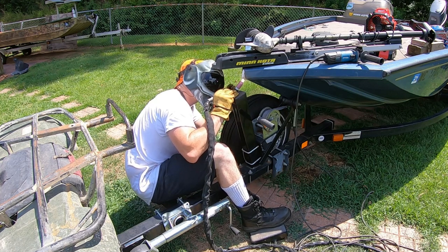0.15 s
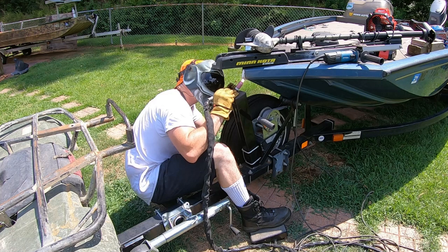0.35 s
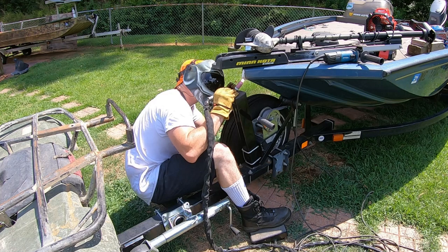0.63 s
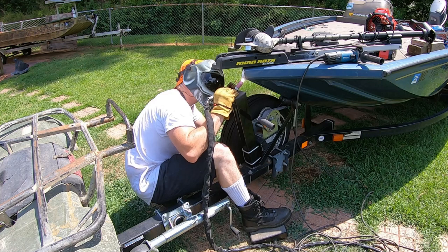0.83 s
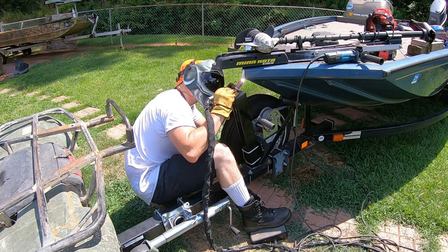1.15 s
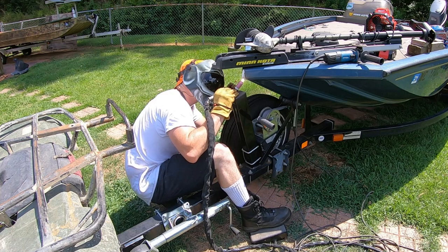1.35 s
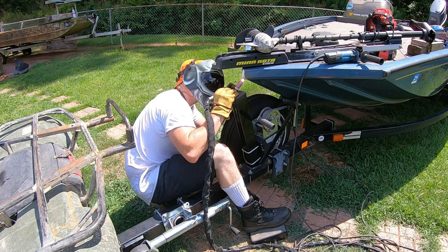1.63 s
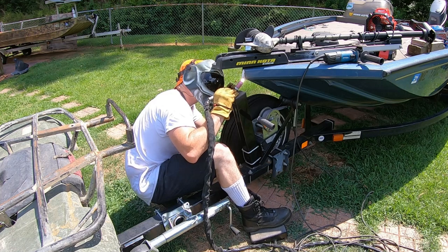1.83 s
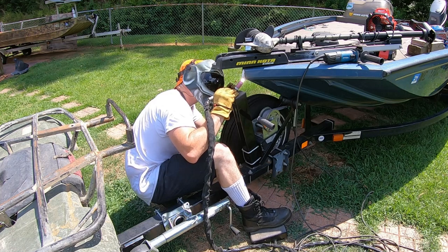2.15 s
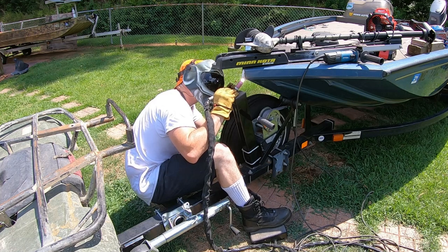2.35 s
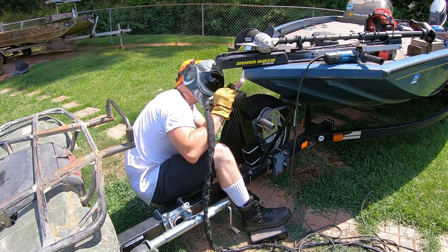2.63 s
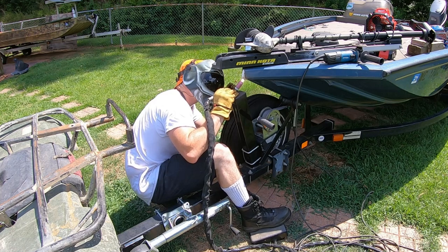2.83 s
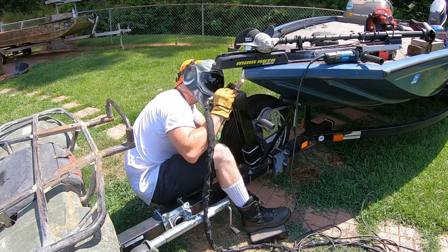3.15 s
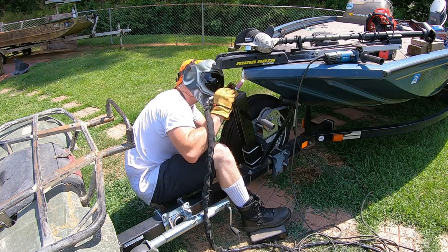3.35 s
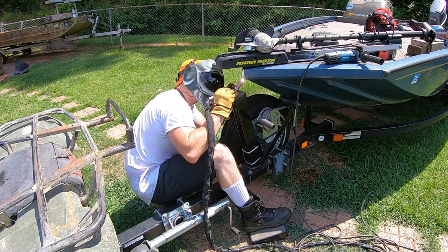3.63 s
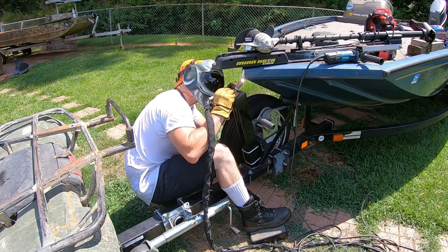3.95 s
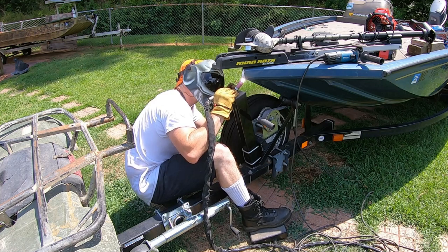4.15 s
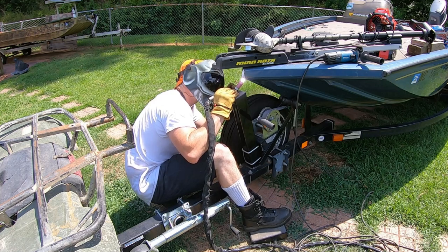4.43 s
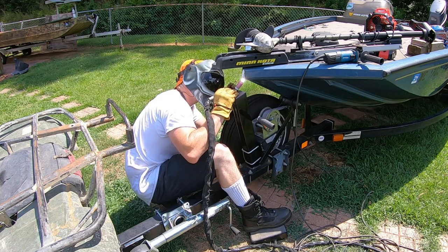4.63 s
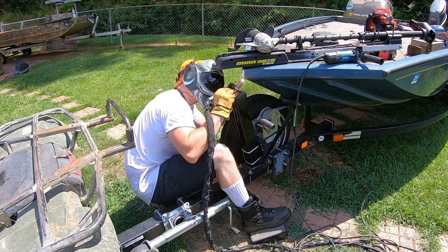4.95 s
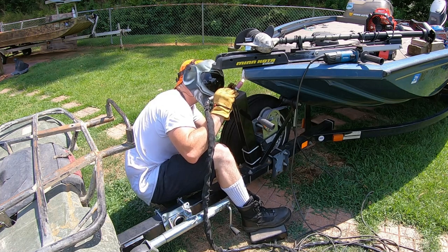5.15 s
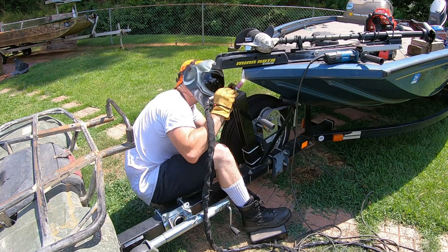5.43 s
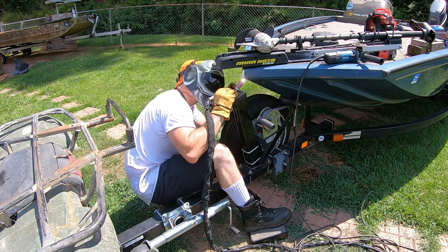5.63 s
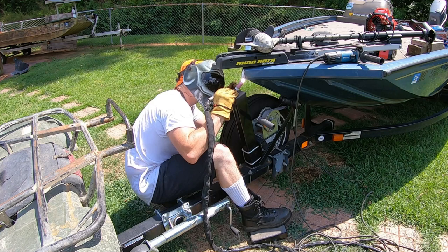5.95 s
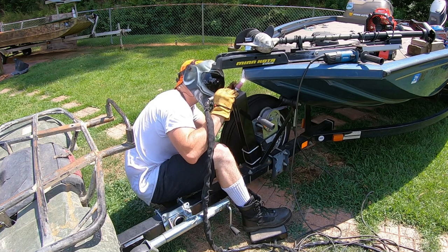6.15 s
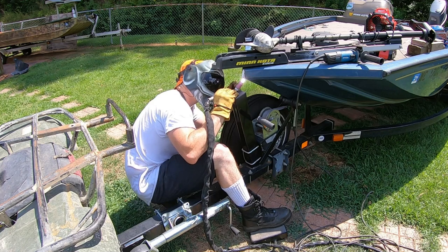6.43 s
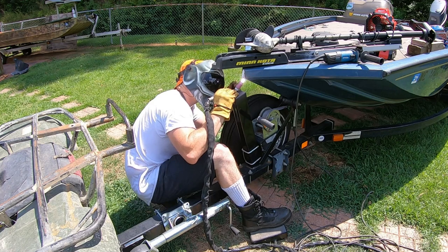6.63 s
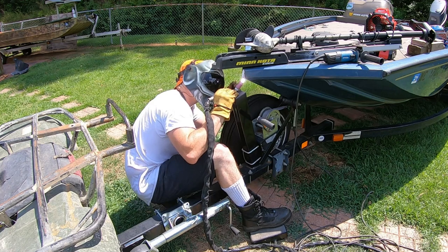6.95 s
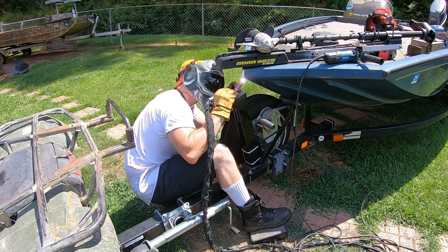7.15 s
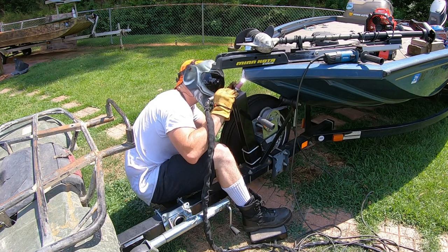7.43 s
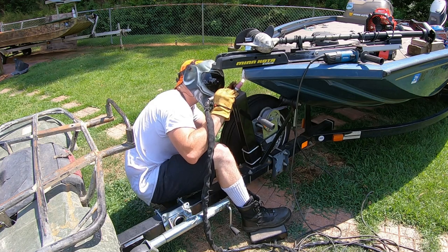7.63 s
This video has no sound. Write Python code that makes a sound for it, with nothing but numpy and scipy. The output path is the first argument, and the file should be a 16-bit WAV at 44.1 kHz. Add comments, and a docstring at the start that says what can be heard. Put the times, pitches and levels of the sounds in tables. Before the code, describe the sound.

Outdoors in a grassy yard, a small camera a few metres off picks up a steady raspy welding buzz, thin and bright, made of dense sharp electrical cracks with sizzling edges. The arc starts softer, grows strong, dips a few times as current is eased, and holds strong near the end. Short reflections from hull and trailer and a faint metallic ring colour it; quiet far traffic, hum and low wind flutter underneath.

```python
"""An alternating-current welding arc on a metal boat hull in a yard, a few metres from a small camera.
The arc cracks at each reversal of the current, twice a cycle, and the timing hitches every sixth cycle.
Filtered clicks make the cracks, gated noise their fizz; hull, trailer and ground echo them, the hull rings.
Behind lie far traffic and machinery (flickering noise bands), a machine's hum (wavering tones)
and wind on the microphone (very low noise)."""
import sys
import numpy as np
from scipy import signal
from scipy.fft import rfft, irfft, next_fast_len
from scipy.io import wavfile
from scipy.ndimage import uniform_filter1d

SR = 44100
rng = np.random.default_rng(int(sys.argv[2]) if len(sys.argv) > 2 else 0)


def amplitude_ratio(level_db):
    """Convert a level in decibels to the matching linear amplitude (field) ratio."""
    exponent = np.asarray(level_db, float) / 20
    return 10 ** exponent


def bounce(signal):
    """Save signal as a 16-bit WAV file at the path given by the first command-line argument."""
    frames = np.transpose(np.atleast_2d(signal))
    limited = np.clip(frames, -1, 1)
    pcm = np.round(limited * 32767).astype(np.int16)
    wavfile.write(sys.argv[1], SR, pcm)


N = 343539

# wind at the microphone port: t/s, level/dB
WIND_LEVEL = [(0.0, -34.5), (0.39, -31), (0.82, -36), (0.89, -28.5), (1.93, -48), (2.08, -28.5),
              (4.58, -41), (5.68, -22), (5.79, -43), (5.95, -35), (7.03, -38.5), (7.12, -21), (7.27, -48),
              (7.4, -34), (7.72, -32), (7.79, -46)]
# spectrum of the far yard, relative density: f/Hz, level/dB
YARD_SPECTRUM = [(18, -28), (30, -18), (59, -17), (164, -12.5), (249, -3), (389, -16), (479, -9),
                 (709, -14.5), (1970, -16.5), (4660, -24), (7650, -36), (9940, -25), (15500, -56)]
# course of the far yard: t/s, level/dB
YARD_COURSE = [(0.0, -40.5), (0.91, -32.5), (1.45, -41), (1.84, -34.5), (2.75, -39), (3.36, -33),
               (5.05, -40.5), (5.51, -34), (6.25, -41), (7.79, -41.5)]
# tones of the machine's hum, nominal peak level: f/Hz, level/dB
HUM_TONES = [(107.7, -51), (209.9, -49.5)]
# loudness of the arc as the pedal eases the current off and on: t/s, level/dB
ARC_LEVEL = [(0, -28.5), (.54, -23.5), (.6, -20.5), (.89, -21.5), (.95, -17), (1.43, -22.5), (1.54, -29),
             (1.8, -26.5), (1.84, -21), (1.99, -17.5), (2.3, -20.5), (2.54, -19.5), (2.95, -25.5),
             (3.14, -22.5), (3.43, -22.5), (3.58, -19), (4.12, -21), (4.36, -18), (4.87, -22.5), (4.9, -30),
             (5.32, -25), (5.37, -21.5), (5.68, -18), (5.9, -20), (7.68, -20.5), (7.76, -26)]
# colour of the first and of the second crack of a cycle: f/Hz, level/dB
FIRST_CRACK = [(300, -46.0), (600, -29.5), (1000, -30.0), (1800, -16.5), (3000, -7.5), (4600, -2.0),
               (6000, 0.0), (7500, -1.5), (9000, -4.0), (10200, -21.0), (12000, -31.0), (14000, -29.5),
               (15700, -35.0)]
SECOND_CRACK = [(300, -46.0), (600, -31.0), (1000, -22.5), (1800, -10.0), (3000, -6.5), (4600, -6.0),
                (6000, -2.5), (7500, -5.0), (9000, -6.0), (10200, -30.0), (12000, -33.5), (14000, -30.0),
                (15700, -37.0)]
# lift that the camera housing gives the cracks and their fizz: f/Hz, level/dB
HOUSING_LIFT = [(1000, -2), (1700, 1.5), (2700, 0), (5000, 0.5), (9000, 1), (10000, 4), (11500, 4),
                (12800, 15.5), (14200, 9), (15700, 6.5)]
# low band, treble and topmost treble of the cracks against their middle band:
# t/s, low level/dB, treble level/dB, topmost level/dB
CRACK_BALANCE = [(0, -0.5, 7, 2), (.45, -1, 7, -2), (.75, 0, 4, -7), (1.2, 0, 1, 3), (1.45, 0, 0, 1),
                 (1.7, -1, 7, 2), (2, 0.5, -3, -2), (2.3, 0.5, -2, 2), (2.8, 0, 1, -1), (3.3, -1.5, 7.5, 3),
                 (3.6, -0.5, 2, -6), (4.2, 0, -3, -3), (4.5, 3, -4, 3), (5.1, -0.5, 6, 4),
                 (5.45, -0.5, 0, -4), (6, 1, -1, 1.5), (7.5, 2, -2.5, 3), (7.79, 0, -2, -3)]
# moments when the cracks flare bright: t/s, treble lift level/dB, length/s
BRIGHT_FLARES = [(7.335, 8, 0.011)]
# stumbles, where a run of cycles jumps across its window: first crack t/s
RUN_STUMBLES = [2.56996, 2.8081, 2.87082, 2.92783, 3.40786, 3.47016, 3.52815, 4.01021, 4.3679, 4.43079,
                4.48788, 5.26996, 5.32782, 6.64996, 6.88785, 6.95032]
# echoes off hull, trailer and ground: delay/ms, signed gain/1
NEAR_ECHOES = [(0.156, -0.43), (0.227, -0.79), (0.315, -0.45), (0.445, 0.16), (0.522, 0.33), (0.649, 0.17),
               (0.709, -0.12), (0.765, 0.13), (0.918, 0.19), (1.035, -0.14), (1.207, 0.14), (1.264, -0.1),
               (1.369, -0.1), (1.457, 0.11), (1.599, 0.12), (1.738, -0.08), (1.834, 0.13), (1.91, 0.14),
               (2.163, 0.19), (2.268, -0.06), (2.389, -0.17), (2.554, 0.12), (2.707, 0.09), (2.769, -0.07),
               (2.911, 0.05), (3.107, 0.08), (3.455, 0.13), (3.591, -0.12), (3.812, -0.12), (4.28, -0.1),
               (4.816, -0.15), (4.921, -0.1), (5.02, -0.23), (5.105, -0.18), (5.261, 0.1), (5.553, -0.07)]
# plate modes of the hull, relative level: f/Hz, width/Hz, level/dB
HULL_MODES = [(494, 22, -12.5), (597, 8.9, 9.5), (796, 116, -2), (1535, 18, -0.5)]

CYCLE_S, SWING_S, RESET_S = .0099843, .00401, .0071  # cycle; first to second crack; second crack to next run
# runs of six cycles follow a clock: period, first run, window of lateness (s)
CLOCK_S, FIRST_RUN_S, EARLY_S, LATE_S = .06, -.0122, 0, .0021
# on low current each run slips later until it is pulled back; on full current some runs stray at random
LOW_DB, SLIP_S, PULL_S, STRAY_S, STRAY_SHARE = -22, .00048, .002, .0004, .5

T = np.arange(N) / SR
SIZE = next_fast_len(N + SR // 4)  # room for echoes to run out
HZ = np.arange(SIZE // 2 + 1) * SR / SIZE


def unit(x):
    """Scale to rms 1."""
    return x / np.sqrt(np.mean(x ** 2))


def curve(table, column=1):
    """One column of a table, for every sample."""
    rows = np.array(table)
    return np.interp(T, rows[:, 0], rows[:, column])


def swing(table, column=1):
    """A column's movement about its mean."""
    course = curve(table, column)
    return course - course.mean()


def colour_db(points, hz):
    """Straight lines on a log-frequency axis."""
    rows = np.array(points)
    return np.interp(np.log(hz + 1), np.log(rows[:, 0]), rows[:, 1])


def walk(rate):
    """Random levels held 1 / rate s and slewed twice; spread near 1."""
    hold = int(SR / rate)
    steps = np.repeat(rng.standard_normal(N // hold + 1), hold)
    slewed = uniform_filter1d(uniform_filter1d(steps, hold), hold)
    return 1.35 * slewed[:N]


def noise(gain):
    """Noise with this gain at each frequency, rms 1."""
    white = rfft(rng.standard_normal(SIZE))
    return unit(irfft(white * gain, SIZE)[:N])


def wind():
    """Slow pressure swings at the microphone port: noise of a few hertz."""
    rise = (HZ / 1.5) / (1 + HZ / 1.3)
    fall = 1 + (HZ / 5.2) ** 2.37
    return amplitude_ratio(curve(WIND_LEVEL)) * noise(rise / fall)


def far_yard():
    """Far traffic and machinery: overlapping octave bands of noise that flicker alone."""
    bands = 0
    for hz in 40 * 2. ** np.arange(9):
        octaves_off = np.clip(np.log2((HZ + 1) / hz), -1, 1)
        band = amplitude_ratio(colour_db(YARD_SPECTRUM, HZ)) * np.cos(np.pi / 2 * octaves_off)
        bands = bands + amplitude_ratio(1.87 * walk(6)) * np.sqrt(np.mean(band ** 2)) * noise(band)
    return amplitude_ratio(curve(YARD_COURSE)) * unit(bands)


def machine_hum():
    """A machine's low tones, wavering in level and pitch, that swell and sink with the far yard."""
    hum = 0
    for hz, db in HUM_TONES:
        level = amplitude_ratio(db + 2. * walk(4.4))
        pitch = hz * (1 + 0.00542 * walk(4))
        hum = hum + level * np.sin(2 * np.pi * np.cumsum(pitch) / SR)
    return amplitude_ratio(swing(YARD_COURSE)) * hum


def causal(points, size=1024):
    """Response with this colour that starts at once (folded cepstrum), its trough moved to time zero."""
    grid_hz = np.arange(size // 2 + 1) * SR / size
    cepstrum = irfft(np.log(amplitude_ratio(colour_db(points, grid_hz))))
    folded = np.r_[cepstrum[0], 2 * cepstrum[1:size // 2], np.zeros(size // 2)]
    response = irfft(np.exp(rfft(folded)))[:size // 4]
    return rfft(response, SIZE) * np.exp(2j * np.pi * HZ * .0001)


def clicks(times, gains):
    """Spectrum of clicks placed between samples by a windowed sinc."""
    at = (times + .1) * SR  # 0.1 s late, undone below, so that times before zero fit
    taps = np.floor(at)[:, None] + np.arange(-7, 9)
    off = taps - at[:, None]
    weights = gains[:, None] * np.sinc(off) * np.cos(np.pi * off / 16) ** 2
    x = np.bincount(taps.astype(int).ravel(), weights.ravel(), SIZE)
    return rfft(x) * np.exp(2j * np.pi * HZ * .1)


def runs():
    """First crack of each run: the clock tick plus a lateness that slips, strays or stumbles."""
    ticks = FIRST_RUN_S + CLOCK_S * np.arange(int(N / SR / CLOCK_S) + 2)
    low = np.interp(ticks, T, curve(ARC_LEVEL)) < LOW_DB
    strays = rng.random(len(ticks)) < STRAY_SHARE
    stray = rng.standard_normal(len(ticks)) * STRAY_S * strays
    jumps = {round((s - FIRST_RUN_S) / CLOCK_S): s for s in RUN_STUMBLES}
    late, starts = SLIP_S / 2, []
    for k, tick in enumerate(ticks):
        if k in jumps:
            late = jumps[k] - tick
        elif low[k]:
            late = late + SLIP_S - PULL_S * (late + SLIP_S > LATE_S)
        else:
            late = np.clip(late + stray[k], EARLY_S, LATE_S)
        starts.append(tick + late)
    return np.array(starts)


def reversals():
    """Times of both cracks; the last back swing of a run comes early when the next run is due soon."""
    starts = runs()
    first = starts[:, None] + CYCLE_S * np.arange(6)
    second = first + SWING_S
    second[:-1, -1] = np.minimum(starts[1:] - RESET_S, second[:-1, -1])
    # with little time left the back swing fails, with none the whole cycle
    gap = second - first
    return first[gap > .00004], second[gap > .0002]


def crack_spectra(below, housing, scatter_db=1.0):
    """Spectra of the cracks, in four bands of their own strength, and of the bare strikes behind them."""
    bands = below[1] - below[0], below[0], below[2] - below[1], 1 - below[2]
    flare = sum(db * np.exp(-((T - s) / length) ** 2) for s, db, length in BRIGHT_FLARES)
    treble_db = curve(CRACK_BALANCE, column=2) + flare
    topmost_db = curve(CRACK_BALANCE, column=3) + flare
    bands_db = 0 * T, curve(CRACK_BALANCE), treble_db, topmost_db
    # the second crack follows the arc level, and its treble fades faster on low current
    back_db = 0.28 * swing(ARC_LEVEL) + 0.99 * walk(2.024)
    back_treble_db = -3 + 1.2 * swing(ARC_LEVEL)
    first, second = reversals()
    kinds = (first, FIRST_CRACK, 0 * T, 0 * T), (second, SECOND_CRACK, back_db, back_treble_db)
    cracks, strikes = 0, 0
    for times, colour, extra, sheen in kinds:
        shape = housing * causal(colour)
        chances = rng.standard_normal((len(bands), len(times)))
        for band, db, treble, chance in zip(bands, bands_db, (0, 0, 1, 1), chances):
            level = np.interp(times, T, db + extra + treble * sheen) + scatter_db * chance
            cracks = cracks + band * shape * clicks(times, amplitude_ratio(level))
        strikes = strikes + clicks(times, amplitude_ratio(np.interp(times, T, extra)))
    return cracks, strikes


def plasma_fizz(strikes, below, housing, fizz_db=-19, settle_s=.003):
    """Noise after each strike that dies as the plasma settles before the next reversal."""
    lag = np.arange(SR // 8) / SR
    gate = irfft(strikes * rfft(np.exp(-lag / settle_s), SIZE), SIZE)[:N]
    # the fizz is brighter than the crack
    bright = amplitude_ratio(colour_db(FIRST_CRACK, HZ)) * housing * (1 + amplitude_ratio(8.0) * (1 - below[1]))
    return rfft(amplitude_ratio(fizz_db) * unit(gate * noise(bright)), SIZE)


def yard_echoes(tail_db=-16, tail_t60=0.075):
    """Direct sound, echoes off hull, trailer and ground, then scattered returns from the whole yard."""
    lag = np.arange(SR // 8) / SR
    early = 1 + sum(gain * np.exp(-2j * np.pi * HZ * ms / 1000) for ms, gain in NEAR_ECHOES)
    tail = rng.standard_normal(len(lag)) * amplitude_ratio(-60 * lag / tail_t60) * (lag > .0055)
    return early + amplitude_ratio(tail_db) * rfft(tail / np.sqrt(np.sum(tail ** 2)), SIZE)


def hull_ring(strikes, hull_db=-26):
    """Resonances of the hull plate, set ringing by each strike."""
    modes = sum(amplitude_ratio(db) / (1 + 2j * (HZ - hz) / width) for hz, width, db in HULL_MODES)
    return amplitude_ratio(hull_db) * unit(irfft(strikes * modes, SIZE)[:N])


def arc():
    """The arc on the hull: cracks and fizz with their echoes, plus the ring, under the arc's level."""
    below = [1 / (1 + (HZ / hz) ** 16) for hz in (4800, 9800, 12300)]  # low-pass gains
    housing = amplitude_ratio(colour_db(HOUSING_LIFT, HZ))
    cracks, strikes = crack_spectra(below, housing)
    fizz = plasma_fizz(strikes, below, housing)
    echoes = yard_echoes()
    crack_sound = unit(irfft(cracks * echoes, SIZE)[:N])
    fizz_sound = irfft(fizz * echoes, SIZE)[:N]
    return amplitude_ratio(curve(ARC_LEVEL)) * (crack_sound + fizz_sound + hull_ring(strikes))


def wander(x, low_db=.4, high_db=1.5):
    """As the torch moves, each kilohertz of the sound swells and sinks a little on its own, the treble most."""
    spectrum, out = rfft(x, SIZE), 0
    for khz in range(18):
        band = np.cos(np.pi / 2 * np.clip(HZ / 1000 - khz, -1, 1)) ** 2
        depth_db = high_db if khz > 9 else low_db
        out = out + amplitude_ratio(depth_db * walk(6)) * irfft(spectrum * band, SIZE)[:N]
    return out


def scene():
    """Left and right are nearly alike; now and then a faint difference flickers between them."""
    far = far_yard() + machine_hum()
    near = wander(arc())
    flicker = np.clip(walk(20) - 1.1, 0, 1)
    # delayed copies: near by 10 ms, far by 1 s
    side = flicker * (amplitude_ratio(-16) * np.roll(near, SR // 100) + amplitude_ratio(-9) * np.roll(far, SR))
    return near + far + wind() + side * np.array([[1], [-1]])


def band_limit(x):
    """A steep low-pass at the top of the band."""
    return signal.sosfilt(signal.butter(12, 16180, fs=SR, output="sos"), x)


def record(dry):
    """The camera rounds the loudest peaks and cuts the top."""
    rounded = dry / (1 + np.abs(dry / 1.05) ** 4) ** .25
    top_cut = signal.ellip(10, .2, 90, 15800, fs=SR, output="sos")  # low-pass, edge in Hz
    mix = signal.sosfilt(top_cut, rounded)
    return band_limit(mix)


dry = scene()
out = record(dry)
bounce(out)
```